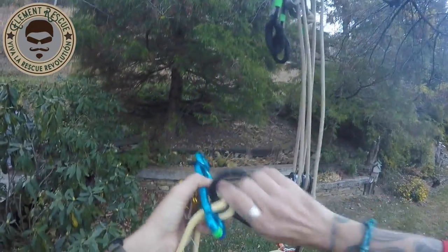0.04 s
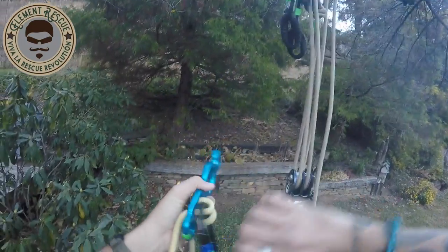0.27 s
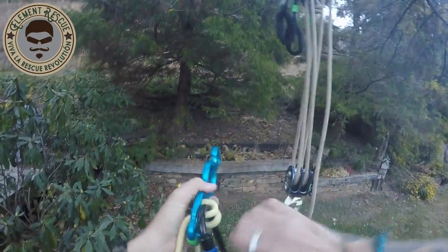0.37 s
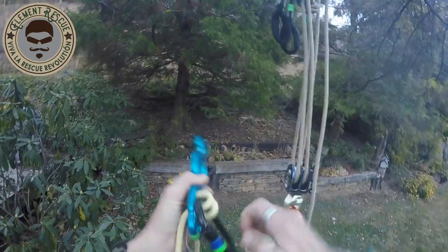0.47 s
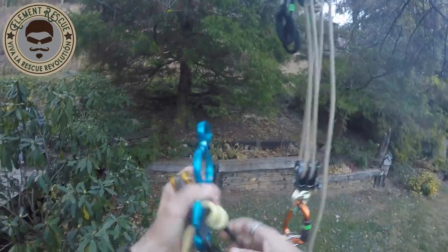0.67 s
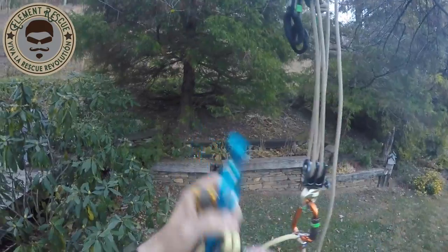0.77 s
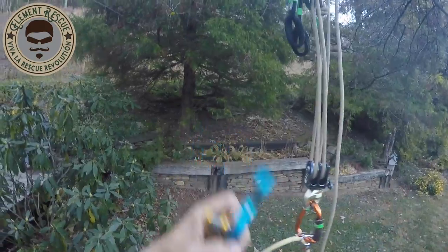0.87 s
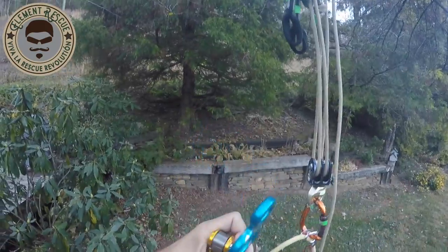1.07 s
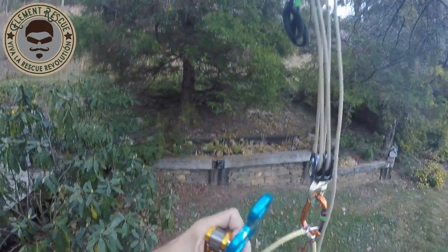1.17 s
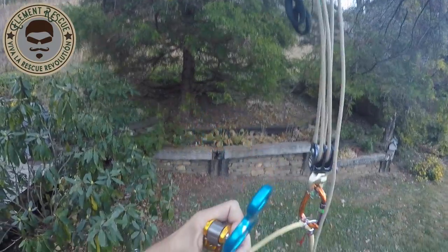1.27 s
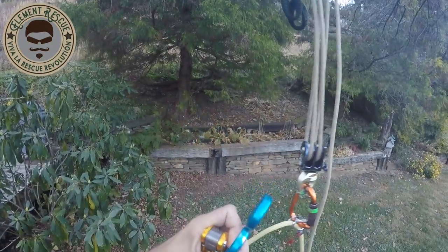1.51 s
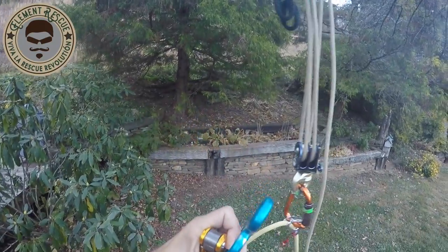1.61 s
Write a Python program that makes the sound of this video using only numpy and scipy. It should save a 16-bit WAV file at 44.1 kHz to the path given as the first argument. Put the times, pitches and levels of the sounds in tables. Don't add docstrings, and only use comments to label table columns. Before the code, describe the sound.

A sprung metal clip gate clacks shut loudly, followed by small metallic knocks over quiet garden air

```python
import sys
import numpy as np
from scipy import signal
from scipy.fft import rfft, irfft
from scipy.io import wavfile
from scipy.ndimage import uniform_filter1d

SR = 44100
rng = np.random.default_rng(int(sys.argv[2]) if len(sys.argv) > 2 else 0)


def ratio_of_db(decibels):
    return 10 ** (np.asarray(decibels, float) / 20)


def dump(signal):
    limited = np.clip(np.atleast_2d(signal).T, -1, 1)
    pcm = np.round(limited * 32767).astype(np.int16)
    wavfile.write(sys.argv[1], SR, pcm)


N = 72765

# t/s, level/dB, chatter/s
SNAP_HITS = [
    (.2485, -11, .0010),
    (.2496, -6, .0009),
    (.2548, 0, .0011),
    (.2567, -4, .0009),
    (.2590, -16, .002),
    (.2640, -23, .003),
]
# f/Hz, level/dB (per Hz)
SNAP_SPECTRUM = [(400, -37), (1200, -9), (3000, -8.5), (4150, 2), (6200, -11), (8400, -5), (11300, 1.5),
                 (15000, -10)]
# f/Hz, level/dB, T60/s
SNAP_RING = [(620, -17, .02), (1150, -14, .02), (2837, -13, .018), (3400, -8, .018), (4120, -1, .012),
             (4262, -3, .014), (4840, -7, .02), (8390, -4, .012), (8021, -26, .07), (10620, -1, .012),
             (10780, -1, .014), (11260, -2, .014), (11640, -2, .016), (12750, -6, .016)]


def gate_snap(tail):
    return struck_metal(SNAP_HITS, SNAP_SPECTRUM, SNAP_RING, tail, ring_db=-9, crack_t60=.005, echo_db=-19)


# t/s, level/dB, chatter/s
SCRAPE_HITS = [
    (.2184, -33, .003),
    (.2240, -38, .002),
    (.2287, -37, .001),
    (.2310, -36, .003),
    (.3140, -44, .002),
    (.3200, -39, .003),
]
# f/Hz, level/dB (per Hz)
SCRAPE_SPECTRUM = [(500, -7), (1300, 12), (2500, -3), (4800, 3), (7000, -8), (10000, -1), (14500, -1),
                   (15800, -14)]
# f/Hz, level/dB, T60/s
SCRAPE_RING = [(1200, -8, .012), (4850, 0, .022)]


def gate_scrape(tail):
    return struck_metal(SCRAPE_HITS, SCRAPE_SPECTRUM, SCRAPE_RING, tail, ring_db=-6, crack_t60=.006, echo_db=-14)


# t/s, level/dB, chatter/s
KNOCK_HITS = [
    (.3438, -17.5, 0.00066),
]
# f/Hz, level/dB (per Hz)
KNOCK_SPECTRUM = [(900, -30), (1600, -29), (2900, -12), (4700, 6.5), (6600, -8), (8500, -1), (11500, -6),
                  (15300, -14)]
# f/Hz, level/dB, T60/s
KNOCK_RING = [(2850, -10, .016), (3170, -3, .024), (4500, -5, .013), (5490, 0, .026), (5460, -13, .085),
              (7520, -13, .035), (8032, -14, .07), (9098, -6, .018), (11340, -23, .08), (15000, -14, .018)]


def frame_knock(tail):
    return struck_metal(KNOCK_HITS, KNOCK_SPECTRUM, KNOCK_RING, tail, ring_db=0, crack_t60=.009, echo_db=-19)


# t/s, level/dB, chatter/s
CLINK_HITS = [
    (.6362, -19, .0008),
    (.6377, -20, .0009),
    (.6446, -26, .0012),
]
# f/Hz, level/dB (per Hz)
CLINK_SPECTRUM = [(1000, -35.5), (2300, -6.5), (3600, -15), (4400, 5.5), (6600, -15.5), (7800, -9.5),
                  (10000, -11.5), (15000, -10.5)]
# f/Hz, level/dB, T60/s
CLINK_RING = [(2982, -13, .03), (3300, -14, .025), (4597, -9, .065), (4480, -5, .016), (5130, 0, .02),
              (5566, -11, .035), (7515, -9, .03), (8043, -13, .068), (11140, -27, .05), (12970, -24, .03)]


def frames_clink(tail):
    return struck_metal(CLINK_HITS, CLINK_SPECTRUM, CLINK_RING, tail, ring_db=0, crack_t60=.008, echo_db=-19)


# t/s, level/dB, chatter/s
THUD_HITS = [
    (.7634, -18, 0.001),
    (.7660, -28.5, 0.00068),
    (.7678, -30.5, 0.00066),
]
# f/Hz, level/dB (per Hz)
THUD_SPECTRUM = [(550, -27.5), (850, -5.5), (1300, 1), (2100, -5), (3500, -12.5), (5700, 4.5),
                 (7100, -10.5), (15000, -7)]
# f/Hz, level/dB, T60/s
THUD_RING = [(1324, -1, .019), (3203, -14, .03), (5486, -11, .025), (6050, 0, .01)]


def knot_thud(tail):
    return struck_metal(THUD_HITS, THUD_SPECTRUM, THUD_RING, tail, ring_db=-5, crack_t60=.009, echo_db=-19)


# t/s, level/dB, chatter/s
TAP_HITS = [
    (.8179, -35.5, 0.0026),
    (.8887, -41.5, 0.0009),
    (.9010, -45, 0.0016),
]
# f/Hz, level/dB (per Hz)
TAP_SPECTRUM = [(1500, -21), (2800, -2.5), (4300, -8), (5400, -1), (6800, -20), (11000, -18),
                (15000, -39.5)]
# f/Hz, level/dB, T60/s
TAP_RING = [(3250, 0, .025), (2750, -6, .02), (5450, -1, .022), (8040, -14, .07)]


def soft_taps(tail):
    return struck_metal(TAP_HITS, TAP_SPECTRUM, TAP_RING, tail, ring_db=-4, crack_t60=.01, echo_db=-20)


def struck_metal(hits, crack, modes, tail, ring_db, crack_t60, echo_db):
    ticks_per_s, tick_spread_db = 20000, 1.5
    chatter, blows = np.zeros(N), np.zeros(N)
    t = np.arange(2048) / SR
    draws = rng.random((8, 3, 2048))
    dense_modes = rng.standard_normal((8, 2048)) * ratio_of_db(-60 * t / crack_t60)
    for (s, db, length), (hit, sign, size), body in zip(hits, draws, dense_modes):
        ticks = (hit < ticks_per_s / SR) * np.sign(sign - .5)
        ticks = ticks * ratio_of_db(-tick_spread_db * np.log(size + 1e-2))
        ticks = np.where(t == 0, 1, ticks)
        ticks = ticks * np.exp(-(t / max(length, 1e-4)) ** 2)
        at = round(s * SR)
        burst = whitened(signal.fftconvolve(ticks, body)[:2048])
        chatter[at:at + 1800] += ratio_of_db(db) * 2 * burst[:1800]
        blows[at] += ratio_of_db(db) * 2
    t = np.arange(6000) / SR
    ring = sum(ratio_of_db(db - 60 * t / t60) * np.sin(2 * np.pi * hz * t) for hz, db, t60 in modes)
    ring = ratio_of_db(ring_db) * signal.oaconvolve(blows, ring / np.linalg.norm(ring))[:N]
    scatter = ratio_of_db(echo_db) * signal.oaconvolve(blows, tail)[:N]
    near = ring + signal.oaconvolve(chatter + scatter, causal(crack))[:N]
    return signal.sosfilt(signal.butter(4, 400, "high", fs=SR, output="sos"), near)


def whitened(x):
    z = rfft(x)
    power = uniform_filter1d(abs(z) ** 2, size=len(z) // 24)
    x = irfft(z / np.sqrt(power + 1e-12), len(x))
    return x / np.linalg.norm(x)


def causal(colour):
    log_gain = np.log(ratio_of_db(read(colour, abs(np.fft.fftfreq(2048, 1 / SR)))))
    taps = np.fft.ifft(np.exp(np.conj(signal.hilbert(log_gain)))).real[:512]
    return taps / np.linalg.norm(taps)


# f/Hz, T60/s
SCATTER_DECAY = [(500, .06), (2000, 0.058), (5000, 0.14), (10000, .15), (15000, 0.12)]


def echo():
    hz, t, z = signal.stft(rng.standard_normal(SR // 4), SR, nperseg=128)
    f, t60 = np.transpose(SCATTER_DECAY)
    band_t60 = np.clip(np.interp(hz, f, t60), .01, 1)[:, None]
    tail = signal.istft(z * ratio_of_db(-60 * t / band_t60), SR, nperseg=128)[1]
    tail = tail * np.minimum(np.arange(len(tail)) / (.002 * SR), 1)
    return tail / np.linalg.norm(tail)


# t/s, length/s, f/Hz, bandwidth/Hz, level/dB
ROPE_ZIP = (.125, .03, 9000, 900, -71)


def rope_zip():
    s, length, hz, width_hz, db = ROPE_ZIP
    band = signal.butter(2, [hz - width_hz / 2, hz + width_hz / 2], "band", fs=SR, output="sos")
    u = np.clip((np.arange(N) / SR - s) / length, 0, 1)
    return ratio_of_db(db) * np.sin(np.pi * u) * evened(signal.sosfilt(band, rng.standard_normal(N)))


# t/s, level/dB
RUSTLE_LEVEL = [(0, -76), (.15, -73.5), (.4, -89), (.55, -71.5), (0.948, -72), (1.2, -77.5), (1.36, -70.5),
                (1.45, -60.5), (1.65, -65.5)]
# f/Hz, level/dB (per Hz)
RUSTLE_SPECTRUM = [(150, -18), (330, 7), (700, -0.5), (1100, -22), (1600, -60)]


def rope_rustle():
    s, db = np.transpose(RUSTLE_LEVEL)
    level = ratio_of_db(np.interp(np.arange(N) / SR, s, db))
    return level * hiss(RUSTLE_SPECTRUM, patchy_db=1.5, swell_db=1.0, size=512)


# t/s, length/s, f/Hz, glide/Hz, level/dB
TONES = [
    (.585, .055, 6700, 120, -72),
    (.59, .045, 13450, 200, -77),
    (.695, .068, 6320, 70, -71),
    (.722, .022, 3180, 20, -71),
    (.4085, .005, 5450, 1, -59),
    (.2305, .007, 4850, -50, -46),
    (.8178, .003, 9100, 1, -56),
]


def bird_and_pings():
    t, out = np.arange(N) / SR, np.zeros(N)
    for start, length, hz, glide_hz, db in TONES:
        u = np.clip((t - start) / length, 0, 1)
        envelope = np.sin(np.pi * u ** .7) ** .5 * (u < 1)
        phase = 2 * np.pi * np.cumsum(hz + glide_hz * u) / SR
        out += ratio_of_db(db) * envelope * np.sin(phase)
    return out


# f/Hz, level/dB (per Hz)
GARDEN_SPECTRUM = [(150, -2), (430, -10), (1000, -7.5), (1300, -15), (2500, -18), (4600, -19.5),
                   (7000, -25.5), (14600, -31)]


def garden_hiss():
    return ratio_of_db(-61.5) * hiss(GARDEN_SPECTRUM, patchy_db=1.8, swell_db=-0.43)


# f/Hz, level/dB (per Hz)
WIND_SPECTRUM = [(15, -0.5), (28, 1.5), (50, 2.5), (70, -6.5), (110, -8.5), (200, -23.5)]


def wind_rumble():
    return ratio_of_db(-57) * hiss(WIND_SPECTRUM, patchy_db=1.0, swell_db=2.76, size=4096)


def camera_whine():
    whine_hz, whine_db = 10275, -74.5
    start_s, pictures_per_s, on_fraction = .0038, 23.976, .5
    t = np.arange(N) / SR
    on = ((t - start_s) * pictures_per_s) % 1 < on_fraction
    gate = uniform_filter1d(on * 1., size=30)
    return ratio_of_db(whine_db) * np.sqrt(2) * gate * np.sin(2 * np.pi * whine_hz * t)


def hiss(colour, patchy_db, swell_db, size=1024):
    hop = size // 4
    frames, hz = N // hop + 5, np.fft.rfftfreq(size, 1 / SR)
    a, b, patches = rng.standard_normal((frames, len(hz), 3)).T
    swell = evened(uniform_filter1d(patches[0], size=6))
    patches = uniform_filter1d(patches, size=10, axis=0)
    patches = evened(uniform_filter1d(patches, size=10, axis=1))
    level_db = read(colour, hz)[:, None] + patchy_db * patches + swell_db * swell
    z = (a + 1j * b) * ratio_of_db(level_db)
    z[hz > colour[-1][0] * 1.04] = 0
    return evened(signal.istft(z, nperseg=size, noverlap=size - hop)[1][:N])


def read(points, hz):
    f, value = np.transpose(points)
    return np.interp(np.log(hz + 1), np.log(f + 1), value, left=value[0] - 12)


def evened(x):
    return x / np.sqrt(np.mean(x ** 2) + 1e-20)


def scene():
    tail = echo()
    mix = gate_snap(tail) + gate_scrape(tail)
    mix += frame_knock(tail) + frames_clink(tail)
    mix += knot_thud(tail) + soft_taps(tail)
    mix += rope_zip() + rope_rustle() + bird_and_pings()
    mix += garden_hiss() + wind_rumble() + camera_whine()
    return mix[None]


def roll_off(x):
    return signal.sosfilt(signal.butter(12, 16590, fs=SR, output="sos"), x)


def record(dry):
    ceiling, edge_hz = .75, 15500
    x = ceiling * np.tanh(dry / ceiling)
    x = signal.oaconvolve(x, signal.firwin(61, edge_hz, fs=SR)[None], "same")
    return roll_off(x)


dry = scene()
out = record(dry)
dump(out)
```